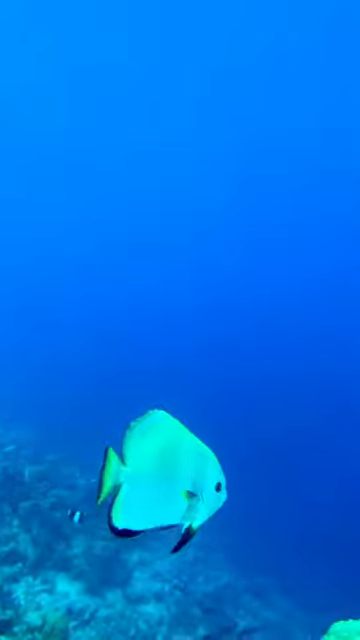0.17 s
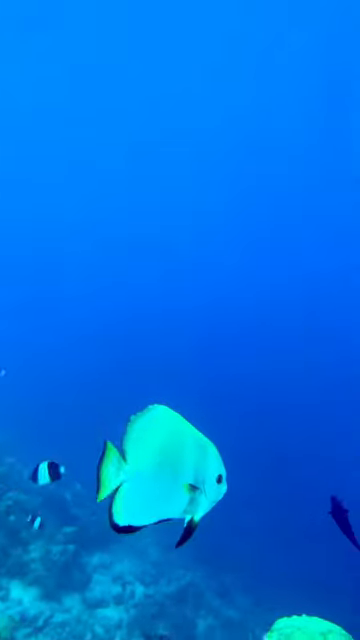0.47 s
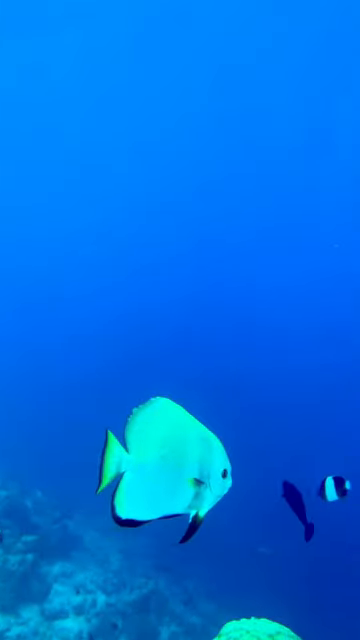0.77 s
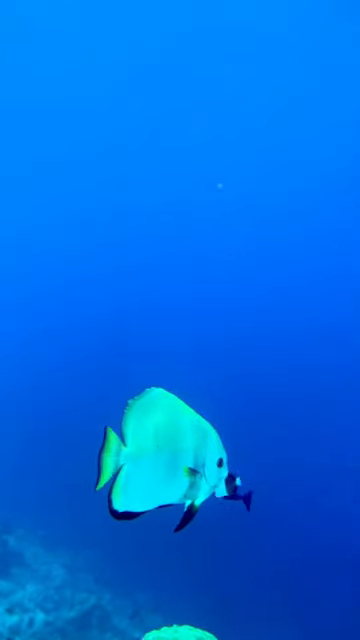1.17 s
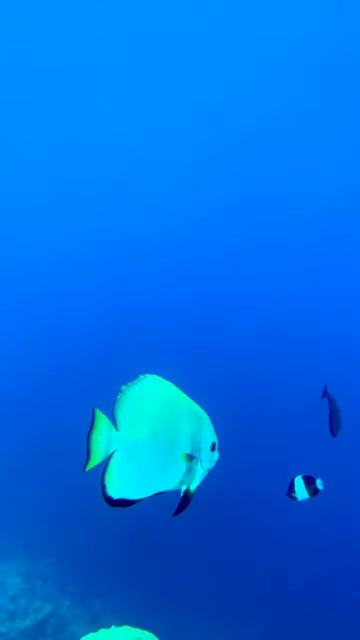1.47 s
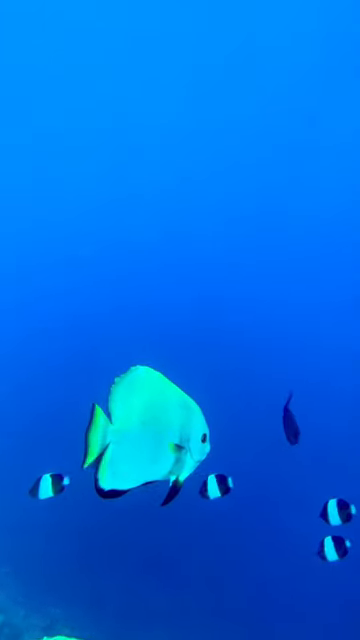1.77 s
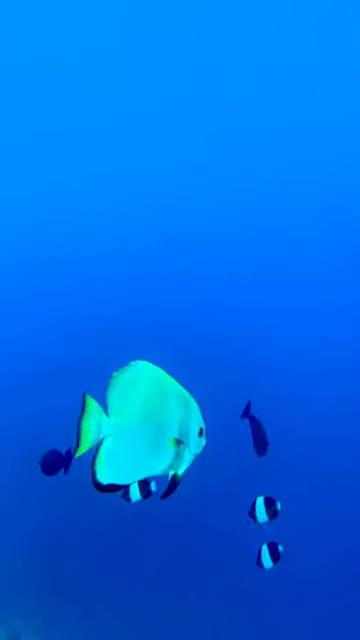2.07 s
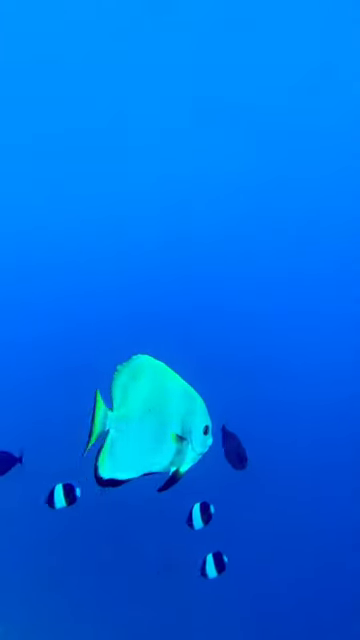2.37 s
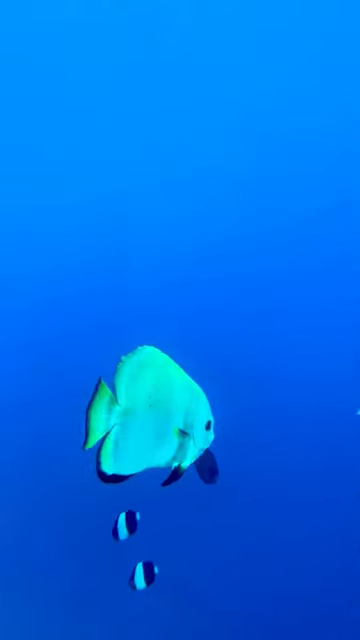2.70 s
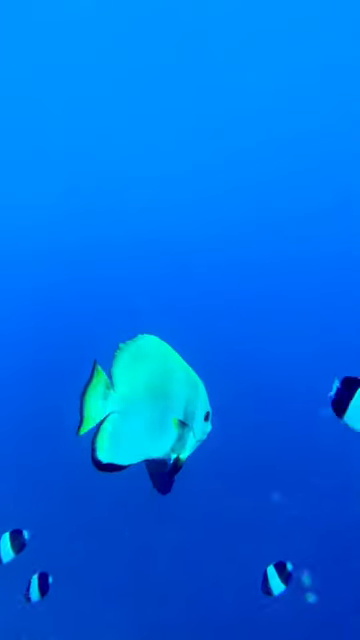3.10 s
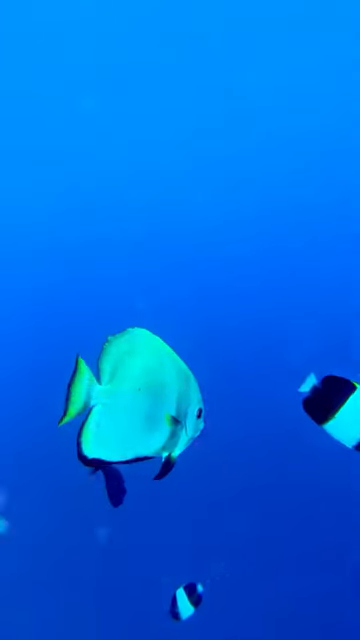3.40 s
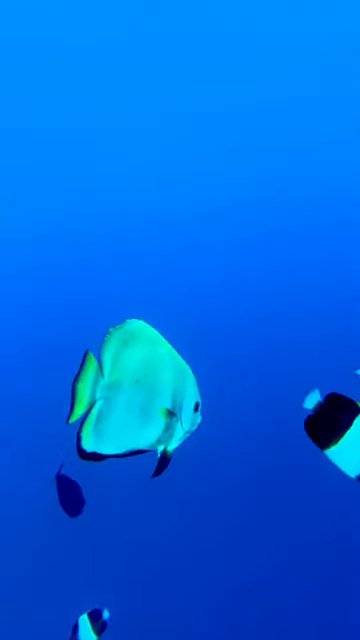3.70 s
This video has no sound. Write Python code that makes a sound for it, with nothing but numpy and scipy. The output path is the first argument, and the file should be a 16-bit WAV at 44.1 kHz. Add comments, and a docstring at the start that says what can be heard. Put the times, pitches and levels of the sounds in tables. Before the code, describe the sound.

Air pockets glug and thump against a submerged camera housing over uneven low rumble; bubbles burble early, while close shrimp snap and a distant coral reef crackles and sizzles, heard muffled from inside the case.

```python
"""Glugs and snapping shrimp on a coral reef

Heard under water from inside a camera housing, the "case". Air pockets glug as sliding tones that shake the case.
Bubbles ring as fading sine tones, with two dull knocks; a bubble cloud rumbles as filtered noise, strongest early.
Shrimp snap as short bursts of noise: a few close by, countless others as ticks and a smooth sizzle."""
import sys
import numpy as np
from scipy import signal
from scipy.fft import rfft, irfft
from scipy.io import wavfile
from scipy.ndimage import uniform_filter1d

SR = 44100
rng = np.random.default_rng(int(sys.argv[2]) if len(sys.argv) > 2 else 0)


def transcribe(signal):
    """Save signal, clipped to [-1, 1], as a 16-bit WAV file at the path in sys.argv[1]."""
    frames = np.atleast_2d(signal).T
    limited = np.clip(frames, -1, 1)
    pcm = np.round(limited * 32767).astype(np.int16)
    wavfile.write(sys.argv[1], SR, pcm)


N = 169785  # length of the scene in samples


def undb(db):
    """Turn decibels into a gain."""
    return 10 ** (np.asarray(db) / 20)


def unit(x):
    """Scale a sound to an rms (average strength) of 1."""
    return x / np.sqrt(np.mean(x ** 2) + 1e-20)


def curve(rows):
    """Join (time, value) rows by straight lines over the whole scene."""
    times_s, values = np.array(rows).T
    return np.interp(np.arange(N) / SR, times_s, values)


def walk(rate_hz):
    """Wander smoothly around zero, heading for a new random value rate_hz times a second."""
    step = int(SR / rate_hz)
    stairs = np.repeat(rng.standard_normal(1000), step)[:N]
    return 2.0 * uniform_filter1d(stairs, step)


def band(x, lo_hz, hi_hz):
    """Keep mainly the sound between two frequencies."""
    edges_hz = [lo_hz, min(hi_hz, SR / 2 - 100)]
    return signal.sosfilt(signal.butter(3, edges_hz, "band", fs=SR, output="sos"), x)


def colour(x, points):
    """Filter through (pitch, level) points without any sound before its cause."""
    size = 8192
    hz, db = np.array(points).T
    grid_hz = np.arange(size // 2 + 1) * SR / size
    gain = undb(np.interp(np.log(grid_hz + 1), np.log(hz), db))
    # folding the cepstrum makes the filter respond as early as it can (minimum phase)
    cepstrum = irfft(np.log(gain))
    cepstrum[1:size // 2] *= 2
    cepstrum[size // 2 + 1:] = 0
    response = irfft(np.exp(rfft(cepstrum)))
    return signal.fftconvolve(x, response)[:len(x)]


def add(out, start_s, x):
    """Mix a short sound in at a given time."""
    i = int(np.clip(start_s * SR, 0, N - 1))
    out[i:i + len(x)] += x[:N - i]


ATTACK_SHARE, RELEASE_SHARE = 0.5, 0.51  # rise and fall times, as shares of a glug's length
WOBBLE = 0.046  # typical random pitch change, as a share of the pitch
SPLASH_STRETCH = 1.25  # the push on the case fades this many times slower than the tone
SPLASH_DB, THUMP_DB = -13, -8.5  # case ring and dull thump, relative to the glug


def swell(u):
    """Rise and fall smoothly around u = 0, where u is time counted in glug lengths."""
    return np.exp(-(u / np.where(u < 0, ATTACK_SHARE, RELEASE_SHARE)) ** 2)


def pulsation(length_s, hz, fall):
    """A pocket of air swings for a few cycles while its pitch slides; the peak lies 0.1 s in."""
    u = (np.arange(SR // 5) / SR - 1 / 10) / length_s
    wobble = np.interp(u, np.linspace(-2, 2, 10), rng.standard_normal(10))
    pitch_hz = hz * 2 ** (-fall * np.clip(u, -1, 2)) * (1 + WOBBLE * wobble)
    phase = 2 * np.pi * np.cumsum(pitch_hz) / SR
    tone = swell(u) * np.cos(phase - phase[SR // 10])  # a crest of the wave falls on the peak
    push = swell(np.where(u < 0, u, u / SPLASH_STRETCH))
    return tone, push


# Air pockets glugging against the case. A negative fall slides the pitch upward.
# Columns: peak_s [s], level_db [dB], length_s [s], pitch_hz [Hz at the peak], fall [octaves per length]
GLUG_EVENTS = [(.821, -24.5, 0.011, 241, -0.17), (.914, -22, 0.02, 190, 0.85),
               (.937, -28, 0.021, 180, 0.62), (.974, -24.5, 0.015, 209, 1),
               (1.037, -25.5, 0.013, 175, -0.014), (1.115, -27.5, 0.025, 177, 0.85),
               (1.288, -17, 0.011, 246, 0.63), (1.300, -14.5, 0.028, 193, 1),
               (1.372, -25, 0.016, 189, 0.86), (1.396, -25, 0.0093, 256, 0.13),
               (1.452, -19.5, 0.0089, 186, 1), (2.311, -25, 0.016, 187, 0.98),
               (2.378, -22.5, 0.017, 241, -0.044), (2.419, -25, .008, 214, 0.17),
               (2.601, -22, 0.011, 233, 0.14), (2.781, -29, 0.017, 173, 1), (2.935, -37, 0.013, 230, -1.7),
               (3.021, -21, 0.015, 155, 0.5), (3.092, -29, 0.011, 207, 0.056),
               (3.220, -29.5, 0.031, 203, 0.24), (3.410, -13.5, 0.011, 175, 0.93)]


def glugs():
    """Each glug is a sliding pulsation that also shakes the case and pushes it with a dull thump."""
    tones, shake = np.zeros(N), np.zeros(N)
    for peak_s, level_db, length_s, pitch_hz, fall in GLUG_EVENTS:
        tone, push = pulsation(length_s, pitch_hz, fall)
        add(tones, peak_s - 1 / 10, undb(level_db) * tone)
        add(shake, peak_s - 1 / 10, undb(level_db) * push)
    splash = undb(SPLASH_DB) * case_ring()
    thump = undb(THUMP_DB) * unit(band(rng.standard_normal(N), 95.0, 187))
    return tones + shake * (splash + thump)


# Low modes of the case: the pitches at which it likes to ring. Each filter is applied twice.
# Columns: pitch_hz [Hz], width_hz [Hz, of one filter pass], level_db [dB, relative to the other modes]
CASE_RESONANCES = [(93, 114, -4.5), (209, 107, -0.5), (290.5, 38, 3), (409.3, 60, 2.5), (603, 114, -9.5),
                   (722, 343, -17)]


def case_ring():
    """Turbulent water, made of noise, rings the low modes of the case, with dark valleys between them."""
    modes = 0
    for pitch_hz, width_hz, level_db in CASE_RESONANCES:
        peak = signal.iirpeak(pitch_hz, pitch_hz / width_hz, fs=SR)
        once = signal.lfilter(*peak, rng.standard_normal(N))
        modes = modes + undb(level_db) * signal.lfilter(*peak, once)
    return unit(band(modes, 71, 1210))


BUBBLE_RISE_S = .0015  # softens the start of each bubble or knock

# Single bubbles as fading tones, and two dull knocks (3.010, 3.541) that die within about one cycle.
# Columns: start_s [s], level_db [dB, before rise and fading], ring_s [s to fade to 37 %], pitch_hz [Hz]
BUBBLE_AND_KNOCK_EVENTS = [(.093, -28.5, 0.025, 275), (.415, -32.5, .008, 673), (.476, -34.5, 0.01, 695),
                           (.908, -34.5, 0.0095, 817), (.293, -25.5, 0.0058, 638),
                           (.384, -23.5, 0.0071, 630), (.528, -34.5, 0.0074, 744), (.587, -28, 0.0068, 730),
                           (0.653, -26, 0.016, 307), (.950, -27, 0.0086, 593), (.950, -38, 0.012, 876),
                           (1.167, -22.5, 0.0049, 370), (1.170, -31.5, 0.01, 635), (1.64, -28, 0.015, 380),
                           (2.379, -34.5, 0.018, 673), (2.402, -23.5, 0.0027, 770),
                           (2.574, -31, 0.046, 403), (2.944, -30, 0.062, 247.7),
                           (3.010, -16.5, 0.0014, 766), (3.400, -18.5, 0.011, 412),
                           (3.525, -25.5, 0.014, 419), (3.541, -15.5, 0.00095, 740)]


def bubbles_and_knocks():
    """Single bubbles ring down at a steady pitch; two dull knocks die within about one cycle."""
    out, t = np.zeros(N), np.arange(SR // 5) / SR
    rise = 1 - np.exp(-t / BUBBLE_RISE_S)
    for start_s, level_db, ring_s, pitch_hz in BUBBLE_AND_KNOCK_EVENTS:
        tone = np.exp(-t / ring_s) * np.sin(2 * np.pi * pitch_hz * t)
        add(out, start_s, undb(level_db) * rise * tone)
    return out


FIZZ_S, FIZZ_PER_S = .72, 140  # bubbles start within this time, this many a second
FIZZ_LOW_HZ, FIZZ_HIGH_HZ = 623, 1470
FIZZ_DB = -40.5  # upper limit of the level, before rise and fading
FIZZ_CYCLES = 5.3  # cycles until a bubble has faded to 37 %
FIZZ_SLOPE = 0.22  # how strongly a higher pitch means a fainter bubble


def fizz():
    """Tiny bubbles burble inside the cloud; the smaller, the higher, shorter and fainter."""
    out, t = np.zeros(N), np.arange(SR // 10) / SR
    rise = 1 - np.exp(-t / BUBBLE_RISE_S)
    for when, height, strength in rng.random((int(FIZZ_PER_S * FIZZ_S), 3)):
        hz = FIZZ_LOW_HZ * (FIZZ_HIGH_HZ / FIZZ_LOW_HZ) ** (height ** 2)  # mostly low pitches
        ring = rise * np.exp(-hz * t / FIZZ_CYCLES) * np.sin(2 * np.pi * hz * t)
        gain = undb(FIZZ_DB) * strength * (FIZZ_LOW_HZ / hz) ** FIZZ_SLOPE
        add(out, when * FIZZ_S, gain * ring)
    return out


SNAP_RISE_S, SNAP_DECAY_S = .0004, .0019  # before stretching
TAIL_DECAY_S, TAIL_DB = .006, -21  # faint tail: time before stretching, level relative to the snap


def snap_envelope(stretch=1):
    """A snap rises within about a millisecond, fades over a few milliseconds and leaves a faint noisy tail."""
    t = np.arange(SR // 20) / SR / stretch
    fading = np.exp(-t / SNAP_DECAY_S) + undb(TAIL_DB) * np.exp(-t / TAIL_DECAY_S)
    return (1 - np.exp(-t / SNAP_RISE_S)) * fading


# How the case colours the shrimp sounds.
# Columns: pitch_hz [Hz], level_db [dB, relative]
CASE_COLOUR = [(600, 12.5), (1700, 4), (2150, -1.5), (2550, 2.5), (2800, 0), (3100, 10), (4050, 6.5),
               (4350, -3.5), (5100, 1.5), (5800, -9.5), (7300, -2), (8100, -12), (12000, -8.5), (12600, -3),
               (13100, -9), (15800, -12)]


def through_case(x):
    """The case strengthens some pitches and weakens others."""
    return colour(x, CASE_COLOUR)


SNAP_SPAN_S = .0009  # a part's whole energy, packed into this time, would have the level in the table

# Snaps of close shrimp.
# Columns: start_s [s], body_db [dB], middle_db [dB], treble_db [dB]
CLOSE_SNAPS = [(.1958, -40, -36, -35), (.2195, -37, -32, -30), (.312, -46, -36, -40), (.443, -53, -41, -39),
               (.6395, -48, -38, -48), (.7275, -34, -28, -37), (.8476, -41, -32, -24),
               (.876, -39, -34, -39), (1.1603, -58, -54, -39), (1.3773, -34, -24, -42),
               (1.515, -33, -41, -46), (2.1255, -37, -32, -42), (2.2152, -42, -35, -47),
               (2.2783, -52, -37, -44), (2.4355, -43, -33, -52), (2.483, -47, -40, -53),
               (2.657, -45, -39, -51), (2.6975, -37, -35, -41), (2.732, -51, -36, -43),
               (2.8345, -52, -42, -41), (2.9131, -45, -32, -42), (3.6958, -47, -37, -46),
               (3.7503, -40, -35, -53)]
# Body, middle and treble of a snap, one row each.
# Columns: from_hz [Hz], to_hz [Hz], stretch [times the basic snap length]
SNAP_PARTS = [(680, 2200, 2.15), (1800, 5700, 1.3), (5330, 16500, 0.76)]


def close_snaps():
    """Nearby shrimp burst with their own balance of body, middle and treble; the treble dies first."""
    out = np.zeros(N)
    for start_s, *levels_db in CLOSE_SNAPS:
        for (from_hz, to_hz, stretch), level_db in zip(SNAP_PARTS, levels_db):
            burst = snap_envelope(stretch) * rng.standard_normal(SR // 20)
            part = band(through_case(burst), from_hz, to_hz)
            even_energy = np.sqrt(SNAP_SPAN_S * SR / np.sum(part ** 2))
            add(out, start_s, undb(level_db) * part * even_energy)
    return out


# Stir of the water along the case, before its flicker.
# Columns: time_s [s], level_db [dB]
STIR_LEVEL = [(0, -41.5), (.4, -41.5), (.7, -42), (.85, -42.5), (1.2, -45.5), (1.5, -41.5), (1.72, -41.5),
              (1.87, -47.5), (2.03, -45.5), (2.1, -43), (2.42, -42), (2.53, -46.5), (2.7, -43),
              (2.88, -41.5), (3.02, -39.5), (3.3, -41.5), (3.57, -38.5), (3.66, -45)]
# Deep rumble of the bubble cloud over time.
# Columns: time_s [s], level_db [dB]
CLOUD_LEVEL = [(0, -44.5), (.25, -36), (.7, -43), (1.5, -51.5), (2.6, -57), (3.1, -47), (3.85, -51.5)]
# Colour of that rumble.
# Columns: pitch_hz [Hz], level_db [dB, relative]
RUMBLE_COLOUR = [(24, -37), (37, -12), (48, -6.5), (62, 3.5), (120, -2.5), (250, -5.5), (500, -26),
                 (1500, -50.5)]


def rumble():
    """Water stirs unevenly along the case, over the deep churn of the bubble cloud."""
    flicker_db = 2 * walk(35)
    stir = case_ring() * undb(curve(STIR_LEVEL) + flicker_db)
    churn = unit(colour(rng.standard_normal(N), RUMBLE_COLOUR))
    return stir + churn * undb(curve(CLOUD_LEVEL))


CRACKLE_PER_S, CRACKLE_DB, FAR_REEF_DB = 260, -58.3, -60.5  # ticks a second; rms of ticks and sizzle
CRACKLE_SPREAD_DB, CRACKLE_RANGE_DB = 5, 21  # typical and largest boost of a tick over the faintest
CRACKLE_TILT_DB = 8  # dull part is lowered and bright part raised by up to twice this


def reef():
    """Countless shrimp farther off: separate ticks, dull or bright, above a smooth sizzle."""
    dull, bright, far = (through_case(rng.standard_normal(N)) for _ in range(3))
    hits = np.zeros((2, N))  # dull and bright strength of each tick
    for when, size, tilt in rng.random((int(CRACKLE_PER_S * N / SR), 3)):
        level_db = min(-CRACKLE_SPREAD_DB * np.log(size), CRACKLE_RANGE_DB)
        tilt_db = CRACKLE_TILT_DB * (2 * tilt - 2) * np.array([1, -1])
        hits[:, int(when * N)] += undb(level_db + tilt_db)
    envelopes = []
    for strengths, stretch in zip(hits, (1, .6)):  # the bright part is shorter
        power = signal.fftconvolve(strengths ** 2, snap_envelope(stretch) ** 2)[:N]
        envelopes.append(np.sqrt(np.abs(power)))
    ticks = envelopes[0] * band(dull, 600, 4000) + envelopes[1] * band(bright, 4030, 21200)
    sizzle = unit(band(far, 640, 14000))
    return undb(CRACKLE_DB) * unit(ticks) + undb(FAR_REEF_DB) * sizzle


def scene():
    """Add up everything that reaches the housing, in one channel."""
    water = glugs() + bubbles_and_knocks() + fizz() + rumble()
    return (water + close_snaps() + reef())[None]


def record(dry):
    """The camera opens its sound a moment late, over 2 ms, and cuts the highest treble."""
    opening = np.clip((np.arange(N) / SR - .035) * 500, 0, 1)  # silent for the first 0.035 s
    top_cut = signal.ellip(10, .2, 70, 15900, fs=SR, output="sos")  # steep low-pass at 15900 Hz
    return signal.sosfilt(top_cut, dry * opening)


dry = scene()
out = record(dry)
transcribe(out)
```